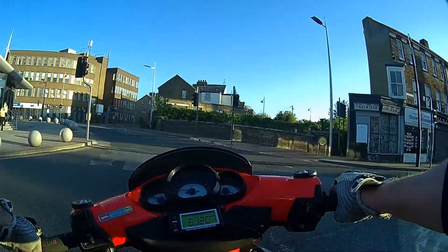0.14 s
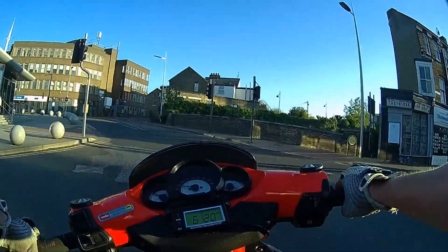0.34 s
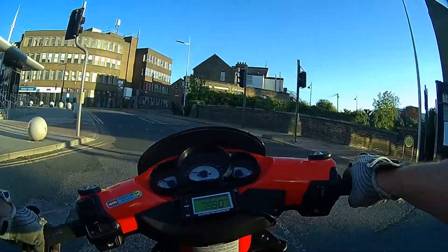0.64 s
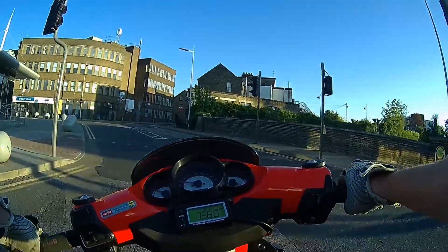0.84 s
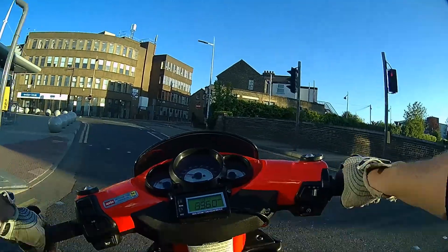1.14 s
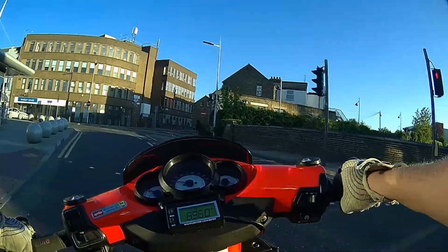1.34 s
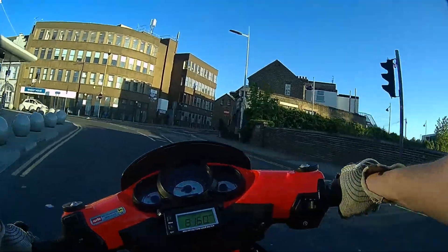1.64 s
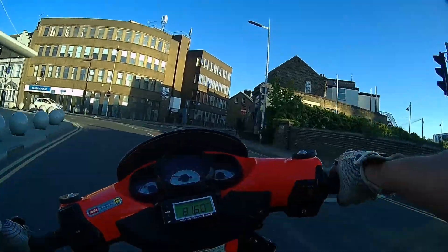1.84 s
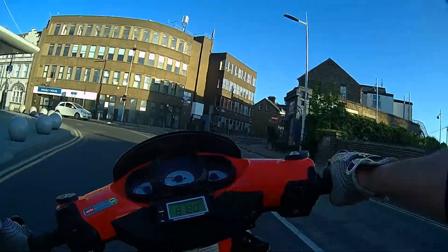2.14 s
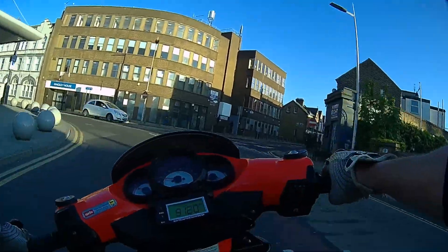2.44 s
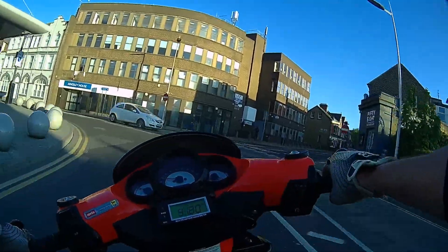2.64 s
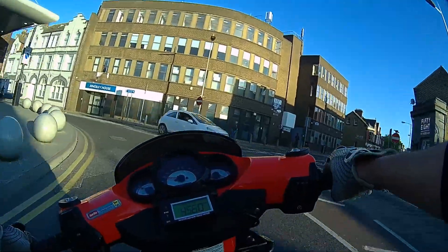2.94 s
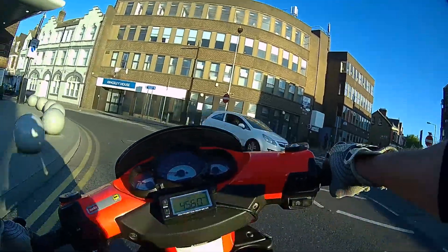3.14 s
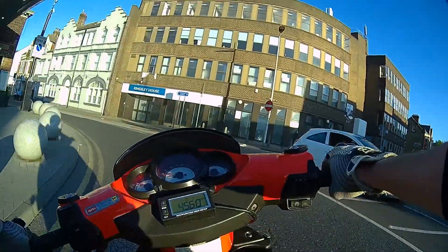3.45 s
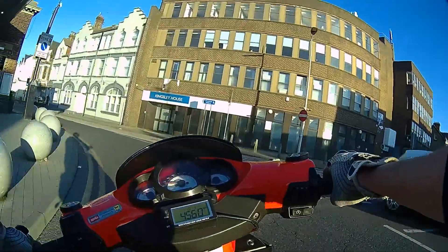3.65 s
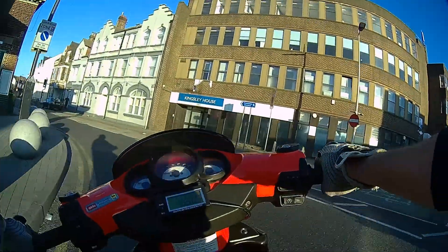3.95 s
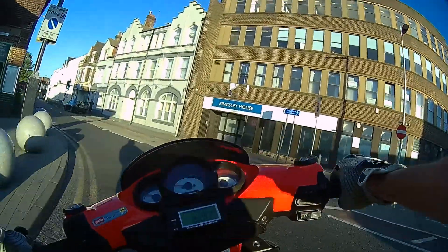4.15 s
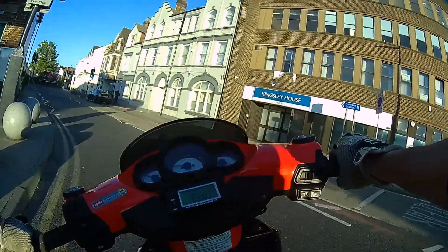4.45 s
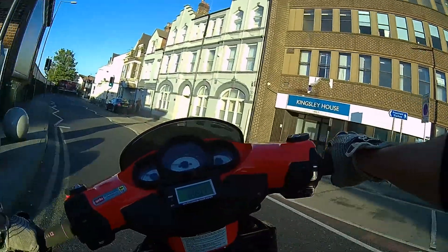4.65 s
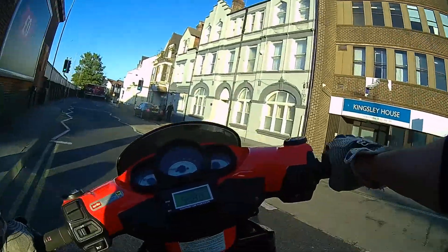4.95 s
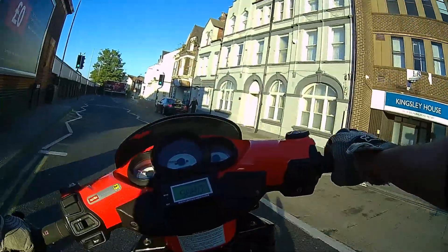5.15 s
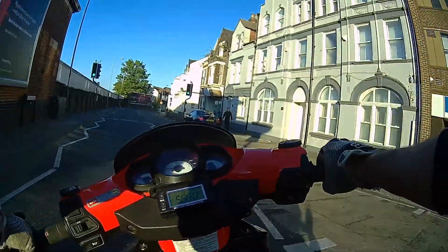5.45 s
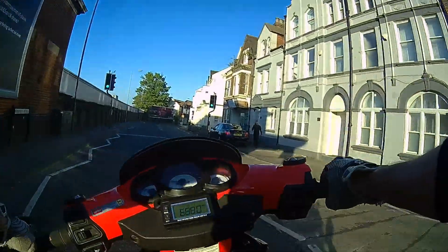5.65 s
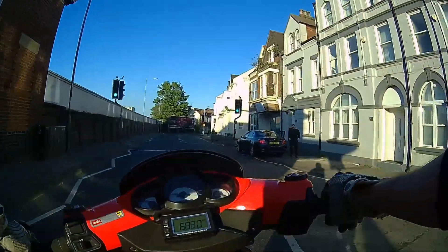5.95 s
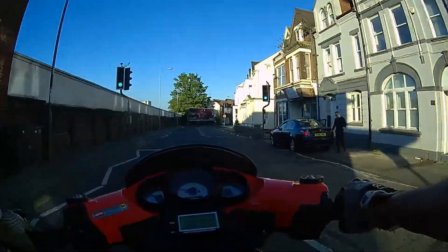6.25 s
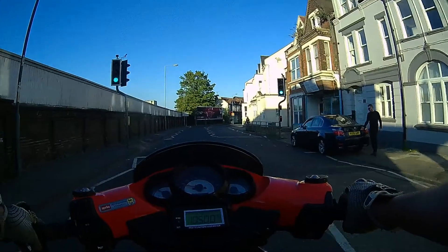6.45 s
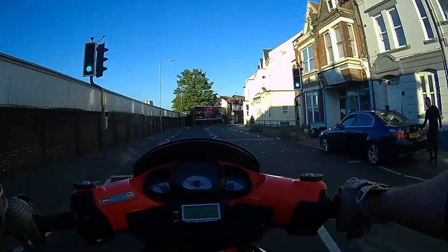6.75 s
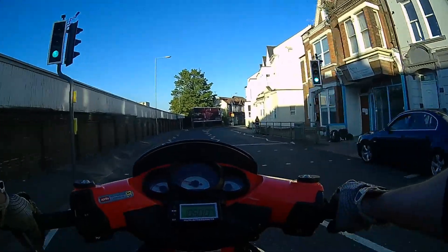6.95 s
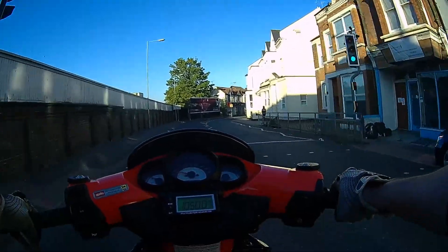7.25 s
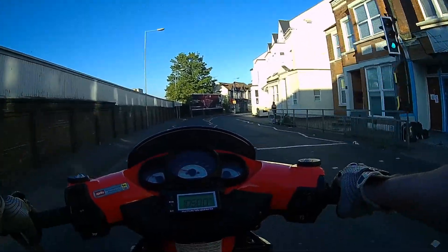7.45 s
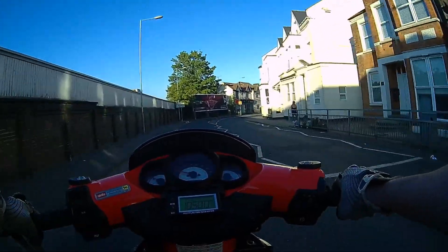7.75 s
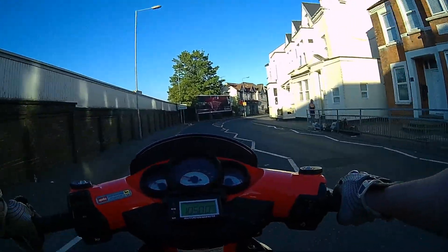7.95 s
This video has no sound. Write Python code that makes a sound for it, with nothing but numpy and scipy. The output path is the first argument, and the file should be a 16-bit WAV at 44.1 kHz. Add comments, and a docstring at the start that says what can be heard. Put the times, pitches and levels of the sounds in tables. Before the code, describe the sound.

A small two-stroke scooter cruises along a town street, heard from the rider's seat. Its engine hums and barks unevenly, then drops in pitch and sputters with dull exhaust thuds as it coasts. It pulls away with a rising rasp, stutters briefly, and settles into a faster, even drone. Wind buffets the microphone over a steady rush of tyres and street, with a few faint ticks from loose parts.

```python
"""A small two-stroke scooter, heard from the rider. It cruises: one firing per crank turn hums and barks
in the exhaust, missing and catching again; the casing hisses, wind buffets the microphone, the street
rushes, loose parts tick. From 1.4 s it coasts through a bend and misses kick and thud in the pipe.
From 3.3 s it pulls away with bite and rasp, stutters again at 4.6-5.2 s, then runs fast and even.
Overtones swell and fade throughout as walls pass."""
import sys
import numpy as np
from scipy import signal
from scipy.fft import rfft, irfft, next_fast_len
from scipy.io import wavfile
from scipy.ndimage import uniform_filter1d, map_coordinates

SR = 44100
rng = np.random.default_rng(int(sys.argv[2]) if len(sys.argv) > 2 else 0)


def generate_wav(sig):
    """Save sig (samples, or channels by samples) to the path in sys.argv[1] as 16-bit PCM at SR."""
    pcm = np.round(np.clip(np.atleast_2d(sig).T, -1, 1) * 32767).astype(np.int16)
    wavfile.write(sys.argv[1], SR, pcm)


N = 356813
TIME_S = np.arange(N) / SR
REF_CRANK_HZ = 90

# engine state: t/s, crank speed/Hz, bark level/dB, swell of the hum/dB, crank shake level/dB
RIDE = [(0, 90.48, -45.5, -3, -36.5), (.5, 90.8, -45, -2, -32), (.88, 91.07, -43.5, -1.5, -33),
        (1.2, 88.4, -40.5, -2, -33.5), (1.35, 87, -47, -1.5, -31), (1.55, 83.64, -59, 0.5, -30.5),
        (1.8, 79.86, -63.5, -5, -30.5), (2.0, 77.46, -52, -4.5, -35), (2.23, 76.46, -54, -5.5, -34),
        (2.4, 76.16, -49, -7, -36.5), (2.85, 76.83, -47.5, -6.5, -42), (3.3, 77.34, -46, -3, -49),
        (3.5, 81, -44, -0.5, -41), (3.76, 84.27, -44, 2.5, -41), (4.0, 87.6, -47, 0, -34.5),
        (4.19, 88.6, -42.5, 0.5, -37), (4.57, 94.6, -40, 4, -35.5), (4.82, 95.65, -40.5, 1.5, -40),
        (4.96, 98.24, -38, 9, -32.5), (5.12, 102.1, -39.5, 6.5, -35.5), (5.29, 105.9, -38.5, 10.5, -33),
        (5.4, 108.6, -38.5, 8.5, -32.5), (5.5, 110.1, -39, 6, -36), (5.75, 111.2, -40, 7, -34.5),
        (6.0, 113, -40, 4.5, -42), (6.35, 115.6, -40, 2.5, -28.5), (6.75, 117.6, -40, 4.5, -27.5),
        (7.05, 116.7, -40.5, 1.5, -25.5), (7.35, 116.5, -40, 4, -27), (7.7, 115.4, -40.5, 3, -31),
        (8.09, 111.8, -40.5, 4, -27)]
# missed firings: t of the catch/s, catch level/dB, miss depth/dB, base length/s
MISSES = [(0.0566, -34.5, 4.2, 0.02), (0.241, -32, 12, 0.024), (0.3678, -29.5, 15, 0.031),
          (0.4502, -31.5, 18, 0.019), (0.6723, -32.5, 9.9, 0.031), (0.7624, -33, 13, 0.032),
          (0.8316, -27, 15, 0.024), (0.908, -32, 12, 0.012), (0.982, -34.5, 6.7, 0.027),
          (1.1017, -29.5, 8, 0.04), (1.1598, -32, 9.5, 0.02), (1.237, -31, 6.7, 0.04),
          (1.2969, -33, 6.4, 0.015), (1.358, -41.5, 4.9, 0.018), (1.4986, -38.5, 16, 0.032),
          (1.607, -40.5, 11, 0.018), (1.717, -42.5, 10, 0.039), (1.8045, -43, 11, 0.021),
          (1.984, -38, 8.4, 0.033), (2.0792, -37, 7.5, 0.048), (2.168, -37.5, 27, 0.048),
          (2.236, -37, 23, 0.03), (2.3144, -37, 10, 0.044), (2.393, -37, 8.3, 0.025),
          (2.458, -35.5, 16, 0.03), (2.54, -35, 17, 0.03), (2.594, -28.5, 8.4, 0.027),
          (2.6672, -30, 12, 0.041), (2.734, -33.5, 14, 0.021), (2.7911, -36, 11, 0.025),
          (2.8558, -33.5, 9.5, 0.024), (2.9084, -31.5, 19, 0.024), (2.9741, -38, 20, 0.037),
          (3.0663, -32.5, 14, 0.032), (3.1315, -34, 8, 0.045), (3.183, -33.5, 10, 0.021),
          (3.249, -35.5, 13, 0.047), (3.314, -33.5, 11, 0.031), (3.366, -38, 5.1, 0.015),
          (4.63, -29, 18, 0.016), (4.672, -27.5, 22, 0.02), (4.7241, -26, 8.5, 0.039),
          (4.8288, -29, 7.1, 0.014), (4.873, -27.5, 18, 0.012), (4.902, -31, 11, 0.013),
          (4.984, -29.5, 18, 0.017), (5.084, -26, 8, 0.0088), (5.174, -28.5, 22, 0.01)]


def amp(db):
    return 10 ** (np.asarray(db) / 20)


def unit(x):
    """x at rms 1."""
    return x / np.sqrt(np.mean(x ** 2) + 1e-20)


def evened(x):
    """x at rms 1 over a sliding 1/3 s."""
    return x / np.sqrt(np.abs(uniform_filter1d(x ** 2, size=SR // 3)) + 1e-12)


def curves(rows):
    """One value per sample for each column after t/s."""
    times, *columns = np.transpose(rows)
    return [np.interp(TIME_S, times, column) for column in columns]


def wobble(rate_hz):
    """Smooth random curve, rate_hz knots a second."""
    t = np.linspace(0, N / SR, num=4000)
    return np.interp(TIME_S, t, map_coordinates(rng.standard_normal(400), [t * rate_hz]))


def coloured(x, points):
    """x through a minimum-phase filter of (f/Hz, gain/dB) points, at rms 1."""
    f, db = np.transpose(points)
    hz = np.fft.rfftfreq(2 ** 13, 1 / SR)
    gain = amp(np.interp(np.log(hz + 1), np.log(f + 1), db))
    cepstrum = irfft(np.log(gain + 1e-6))
    cepstrum[1:len(hz) - 1] *= 2
    cepstrum[len(hz):] = 0
    response = irfft(np.exp(rfft(cepstrum)))[:len(hz)]
    return unit(signal.oaconvolve(x, response)[:N])


def ping(hz, t60_s, attack_s):
    """One decaying mode, 0.1 s long."""
    t = np.arange(SR // 10) / SR
    return amp(-60 * t / t60_s) * (1 - np.exp(-t / attack_s)) * np.sin(2 * np.pi * hz * t)


def struck(events, shape):
    """shape placed at each (t/s, gain/dB) event."""
    out = np.zeros(N + SR)
    for s, db in events:
        out[round(s * SR):][:len(shape)] += amp(db) * shape
    return out[:N]


def timbre_at(s):
    """Exhaust tone colour, 0-3: a blend position among four pipe timbres."""
    positions = [(0, -0.5), (1.25, 0.5), (1.5, 2.5), (1.8, 1.14), (2.1, 1), (3.0, 1.5), (3.5, 1.68),
                 (4.0, 3.5), (4.45, 3), (5.1, 4.5)]  # t/s, blend position before clipping
    return np.clip(np.interp(s, *np.transpose(positions)), 0, 3)


def by_timbre(values, s=TIME_S):
    """Blend of four values, one per pipe timbre."""
    return np.interp(timbre_at(s), range(4), values)


def crank_turns():
    """Turns so far, nudged so that catches at blend positions under 1.6 fall near firings."""
    turns = np.cumsum(curves(RIDE)[0]) / SR
    catches = np.array([s for s, *_ in MISSES if timbre_at(s) < 1.6]) * SR
    bark_lag_turns = 0.101
    phase = 2 * np.pi * (np.interp(catches, np.arange(N), turns) - bark_lag_turns)
    slip = np.arctan2(uniform_filter1d(np.sin(phase), size=7), uniform_filter1d(np.cos(phase), size=7))
    return turns - np.interp(np.arange(N), catches, np.unwrap(slip)) / (2 * np.pi)


def combustion_db():
    """Burn strength: fades in a miss, then unburnt fuel makes it pop and surge."""
    stretch = [0.85, 1.8, 0.5, 0.6]  # miss length factor per timbre
    pop_db, pop_s = [1.8, 3.1, 0.82, 0.77], 0.0082  # level per timbre
    crest_db, surge_s = 10.5, 0.03  # crest: ordinary firing peak over bark level
    bark_db = curves(RIDE)[1]
    t = np.arange(SR // 5) / SR
    burn_db = np.zeros(N)
    for s, catch_db, depth_db, length_s in MISSES:
        at = round(s * SR)
        gap = burn_db[at - round(by_timbre(stretch, s) * length_s * SR):at]
        fade_s = 0.16 * len(gap) / SR + 1e-4
        gap -= depth_db * np.clip(t[:len(gap)] / fade_s, 0, 1)
        surge_db = (catch_db - bark_db[at] - crest_db) * np.exp(-t / surge_s)
        burn_db[at:][:len(t)] += surge_db + by_timbre(pop_db, s) * (t < pop_s)
    return burn_db


def firing_pulses(turns, jitter_turns, scatter_db):
    """One sharp pulse per turn, slightly uneven in time and size."""
    whole = np.arange(1, int(turns[-1]))
    chance = rng.standard_normal((len(whole), 2))
    at = np.interp(whole + jitter_turns * chance[:, 0], turns, np.arange(N))
    taps = at.astype(int)[:, None] + np.arange(-7, 9)
    pulses = np.sinc(taps - at[:, None]) * np.hanning(18)[1:-1] * amp(scatter_db * chance[:, 1:])
    return evened(np.bincount(np.clip(taps, 0, N - 1).ravel(), pulses.ravel(), N))


def road_echo(x, db):
    """x plus its reflection off road and kerb; the delay shifts as the scooter leans."""
    delays = [(0, 4.035), (3.2, 4.12), (3.7, 4.2), (4.3, 4.05), (4.8, 4.0), (5.2, 3.2), (5.6, 3.29),
              (6.1, 3.895), (6.6, 3.6), (6.9, 3.5), (7.1, 3.65), (7.4, 3.75), (7.8, 3.45), (8.09, 3.5)]  # t/s, delay/ms
    lag = (curves(delays)[0] + .06 * wobble(2)) * SR / 1000
    echo = np.interp(np.arange(N) - lag, np.arange(N), x)
    return (x + amp(db) * echo) / np.sqrt(1 + amp(2 * db))


def hum(turns, burn_db):
    """Crank orders 1-9: once-a-turn shake, and overtones that sweep through pipe and frame resonances."""
    orders = [(-29.5, -30.5, -35.5, -31, 0.54), (-32.5, -30.5, -37, -34, 0.87),
              (-31.5, -31.5, -32.5, -39.5, 1.59), (-40.5, -28.5, -29, -35.5, 0.68),
              (-50.5, -35, -39.5, -35, 0.38), (-39.5, -47.5, -41.5, -44, 1.3),
              (-43.5, -41.5, -45, -46.5, 1.1), (-51, -43, -41, -45.5, 0.38)]  # orders 2-9: level/dB in timbres 0-3, dB per dB of swell
    resonances = [(150, 4), (185, -4.5), (205, -0.5), (230, 0.5), (250, 1.5), (270, 10), (305, 5.5),
                  (325, 1.5), (345, 10.5), (365, 4.5), (400, -10.5), (430, -8), (460, 1), (480, -6.5),
                  (520, -10.5), (585, 0), (620, 0.5), (660, -2.5), (700, -8.5), (800, -1), (860, -9),
                  (950, -8.5), (1060, -12.5)]  # f/Hz, gain/dB
    growl = [(0, 3.5, -5, 2, 1.5, -6.5), (1.3, 1, -2, 0.5, -1.5, -5.5), (1.7, 2.5, -3.5, -13.5, -1.5, -9),
             (3.2, -3, 0.5, -7, -3, 3), (3.5, 0.5, -4, 4, 2.5, -2.5), (4.0, 1.5, 4, 0, -2, -2.5),
             (4.4, -3.5, 0.5, 2, 3.5, -3.5), (4.8, 7.5, -1, -5.5, 2, 11.5), (5.1, -1, -0.5, 0, -1.5, 6.5),
             (5.4, 3, -1.5, 0, 1, 3), (5.65, 4, -1, 2.5, -2.5, -1), (5.9, -4.5, 0.5, 0, -5, -7),
             (6.15, -1.5, -5, 7, 5, -6), (6.5, 6, 6, -0.5, 3.5, -3), (6.75, 3.5, 4, -1, -6, -5),
             (6.92, -0.5, 10, -7, -5, -6), (7.1, 0.5, 5.5, 6.5, 4, -14), (7.4, 2, 2, 1.5, 1, -4.5),
             (7.72, 0.5, 2.5, -2, -2.5, -8), (8.09, 1.5, -2, 0, -1, -2)]  # leaning and passing walls: t/s, gain/dB of orders 5-9
    burn_shares = [0.19, 0.096, 0.43, 0.64, 0.11, 0.28, 0.42, 0.98, 0.87]  # share of burn_db felt by orders 1-9; the rest is shake and pumping
    suck_back = [0.14, 0.11, 0.45, 0.35]  # swing of order 3 through zero in a deep miss: share per timbre
    lumpiness = [0.77, 3.5, 1.2, 0.3]  # uneven burning: depth/dB per timbre
    lead_s, ring_on_s = 0.0042, 0.0021  # hum returns ahead of the bark; ringing rounds off each miss
    felt_db = uniform_filter1d(np.roll(burn_db, -int(lead_s * SR)), int(ring_on_s * SR))
    crank_hz, _, swell_db, shake_db = curves(RIDE)
    levels_db = [shake_db]
    for order, (*timbre_db, growth) in enumerate(orders, start=2):
        resonance_db = np.interp(order * crank_hz, *np.transpose(resonances))
        levels_db.append(by_timbre(timbre_db) + growth * swell_db + resonance_db)
    levels_db[4:] = np.add(levels_db[4:], curves(growl))
    lumps_db = by_timbre(lumpiness) * wobble(24)
    out = np.zeros(N)
    for order, (db, share) in enumerate(zip(levels_db, burn_shares), start=1):
        flutter_db = (.8 + .25 * abs(order - 3)) * wobble(11) + .25 * max(order - 3, 0) * wobble(3)
        fired = amp(share * felt_db)
        if order == 3:
            fired -= by_timbre(suck_back) * np.clip(1 - amp(felt_db), 0, 1)
        phase = order * (2 * np.pi * turns + .16 * wobble(5))
        out += amp(db + flutter_db + share * lumps_db) * fired * np.sin(phase)
    return np.sqrt(2) * road_echo(out, db=-15)


def exhaust_jet(turns, burn_db, blasts):
    """Pipe excitation: each blast plus a puff of turbulent gas."""
    gas_share = by_timbre([.06, .2, .09, .2])
    puff = unit(np.exp(0.82 * np.cos(2 * np.pi * turns - 1.2)) * rng.standard_normal(N))
    return np.sqrt(1 - gas_share) * blasts + np.sqrt(gas_share) * amp(burn_db) * puff


def shell_ring(blasts):
    """Blasts ring the silencer's metal shell."""
    spectrum = [(2400, -46.5), (2600, -12), (2690, 1), (2780, -14.5), (3000, -49)]  # f/Hz, gain/dB
    levels = [(0, -66.5), (1.25, -64), (1.5, -77), (5.3, -68.5), (5.7, -56.5), (5.9, -52), (6.08, -50.5),
              (6.25, -60.5), (7.0, -61.5), (8.09, -64.5)]  # t/s, level/dB
    return amp(curves(levels)[0] + 2 * wobble(3.8)) * coloured(blasts, spectrum)


def baffles(x, delay_s_per_hz=3e-6):
    """Silencer baffles delay the higher modes, drawing each pulse into a short sweep."""
    size = next_fast_len(N + SR // 4)
    hz = np.fft.rfftfreq(size, 1 / SR)
    return irfft(rfft(x, size) * np.exp(-1j * np.pi * delay_s_per_hz * hz ** 2), size)[:N]


def passing_walls(x, depth_db):
    """Overtones flare and fade as walls and parked cars pass: random gain patches in f and t."""
    spectra = signal.stft(x, nperseg=1024)[2]
    patches = uniform_filter1d(rng.standard_normal(spectra.shape), size=3, axis=0)
    patches = uniform_filter1d(patches, size=14, axis=1)
    return signal.istft(spectra * amp(depth_db * unit(patches)), nperseg=1024)[1][:N]


def bark(jet):
    """The jet barks out of the pipe's end, crossfading among four timbres."""
    # pipe spectra: f/Hz, gain/dB
    timbre_0 = [(600, -48.5), (850, -25), (980, 0.5), (1160, 5.5), (1300, -0.5), (1460, -10.5), (1680, -3),
                (1800, -13.5), (1950, -6.5), (2150, -10), (2350, 3.5), (2560, -14.5), (2710, -10),
                (2820, -16), (3000, -37.5), (3300, -56.5)]
    timbre_1 = [(600, -27.5), (800, 5.5), (1000, -4), (1100, -16), (1250, -7.5), (1450, -5.5),
                (1700, -12.5), (1890, -15.5), (2200, -10.5), (2400, -13.5), (2580, -26.5), (2900, -33),
                (3300, -52.5)]
    timbre_2 = [(650, -26.5), (850, -1.5), (1050, -6), (1260, 1), (1450, -10), (1700, -5), (1950, -12.5),
                (2150, -1.5), (2400, -0.5), (2600, -13.5), (2900, -37), (3300, -67.5)]
    timbre_3 = [(700, -38.5), (900, 2.5), (1100, -4.5), (1350, -0.5), (1480, -7), (1670, -1), (1820, -6),
                (1960, -11), (2400, -5.5), (2740, -15.5), (2900, -23), (3100, -27.5), (3450, -31.5),
                (3700, -49.5)]
    position = timbre_at(TIME_S)
    direct = np.zeros(N)
    for k, spectrum in enumerate((timbre_0, timbre_1, timbre_2, timbre_3)):
        weight = np.clip(1 - np.abs(position - k), 0, 1)
        direct += weight * coloured(jet, spectrum + [(5000, -110)])
    bark_db = curves(RIDE)[1] + 0.25 * wobble(7.5)
    reflected = road_echo(baffles(direct), db=-4)
    return amp(bark_db) * unit(passing_walls(reflected, depth_db=1.8))


def casing(turns, burn_db, firings):
    """Casing hiss, the same piston and ring rattle each turn, and a faint fan and gear whirr."""
    spectrum = [(2200, -9.5), (2700, 0), (3000, -1.5), (3180, -9), (3400, -2), (3950, -14), (4200, -8),
                (4400, -1.5), (4600, -11), (4950, -9), (5250, -5), (5850, -12), (6350, -9.5), (6900, -18),
                (7400, -14.5), (8700, -21), (10000, -19), (11500, -27.5), (14000, -34), (15500, -30)]  # f/Hz, gain/dB
    whirr_order, ref_bark_db = 29, -45
    crank_hz, bark_db, *_ = curves(RIDE)
    hiss = np.exp(0.079 * np.cos(2 * np.pi * turns - 1.3)) * rng.standard_normal(N)
    rattle = signal.oaconvolve(firings, rng.standard_normal(SR // 100))
    rattle = coloured(rattle, [(100, 0), (6000, 0), (8000, -20)])
    drive = amp(.16 * burn_db + .7 * wobble(18)) * (hiss + .65 * rattle)
    whirr_db = -14 + np.interp(whirr_order * crank_hz, *np.transpose(spectrum)) + 3 * wobble(4)
    whirr = amp(whirr_db) * np.sin(2 * np.pi * whirr_order * turns + 1.2 * wobble(20))
    level_db = -60.5 + 0.37 * (bark_db - ref_bark_db) + 10.5 * np.log2(crank_hz / REF_CRANK_HZ)
    return amp(level_db) * (evened(coloured(drive, spectrum)) + whirr)


def wind_buffet():
    """Head wind hits the microphone in low lumps."""
    spectrum = [(10, -27.5), (20, -11.5), (40, 5), (70, -9), (120, -4), (200, -38), (400, -76)]  # f/Hz, gain/dB
    levels = [(0.0, -58.5), (0.16, -45.5), (1.46, -40), (1.71, -33.5), (1.89, -39.5), (2.46, -38.5),
              (2.52, -42.5), (2.88, -34), (3.54, -54), (3.74, -36), (3.92, -50.5), (4.19, -28.5),
              (4.3, -42), (5.3, -41), (5.7, -35), (6.1, -38), (6.45, -33), (6.8, -41.5), (7.1, -29),
              (7.57, -29), (8.09, -27)]  # t/s, level/dB
    lumps = amp(1.1 * wobble(21)) * coloured(rng.standard_normal(N), spectrum)
    return amp(curves(levels)[0]) * unit(lumps)


def street_rush():
    """Broad noise of tyres and street."""
    spectrum = [(40, -25.5), (80, 1), (150, -4), (300, 1), (450, 0), (620, -6), (800, -14.5), (1100, -23.5),
                (2000, -27), (2800, -29.5), (3500, -70)]  # f/Hz, gain/dB
    levels = [(0, -31), (.4, -30.5), (1.2, -29), (1.6, -34.5), (2.4, -33.5), (2.9, -32), (3.5, -33),
              (4.0, -30.5), (4.5, -31), (5.0, -26), (5.4, -30), (6.2, -30.5), (7.0, -29.5), (8.09, -29)]  # t/s, level/dB
    return amp(curves(levels)[0] + 0.37 * wobble(20)) * coloured(rng.standard_normal(N), spectrum)


def wind_wash():
    """Head wind round the bodywork, rising with crank speed."""
    spectrum = [(450, -19.5), (650, 25.5), (850, 22.5), (1050, 16), (1400, -2), (2200, -8.5), (3000, 3),
                (4800, -6.5), (7000, -12.5), (11000, -24), (15500, -29)]  # f/Hz, gain/dB
    level_db = -50 + 22 * np.log2(curves(RIDE)[0] / REF_CRANK_HZ) + wobble(3.8)
    return amp(level_db) * coloured(rng.standard_normal(N), spectrum)


def whine(hz, db):
    """A thin, slightly wavering tone."""
    return amp(db + 2.7 * wobble(5)) * np.sin(2 * np.pi * hz * TIME_S + .6 * wobble(8))


def loose_parts():
    """Bodywork clicks and a loose steel part ticks, each in one mode."""
    # t/s, gain/dB
    clicks = [(0.626, -66), (1.3404, -55), (1.477, -50), (1.8136, -50), (4.2707, -47)]
    ticks = [(0.9163, -73), (0.9911, -64), (1.1039, -61), (1.1502, -69), (1.2077, -70), (1.4366, -81),
             (1.6322, -68), (3.8237, -70), (4.1714, -67)]
    bodywork = struck(clicks, ping(hz=5230, t60_s=0.012, attack_s=0.0004))
    steel = struck(ticks, ping(hz=9320, t60_s=0.04, attack_s=0.0028))
    return 1.2 * bodywork + 1.8 * steel


def pipe_kicks():
    """A miss upsets the pipe: a dull push of pressure, its undertow and a brief boom."""
    kicks = [(1.499, -29), (1.607, -18), (1.717, -20), (2.459, -20), (2.907, -28), (3.009, -26),
             (3.069, -29.5), (3.188, -26), (1.729, -21), (1.816, -38), (1.985, -27), (2.172, -31),
             (2.24, -24.5), (2.322, -24), (4.618, -21), (4.721, -27), (4.858, -18), (4.972, -20),
             (5.159, -17), (5.183, -28)]  # t/s, gain/dB
    push_s = 0.001
    u = np.arange(SR // 10) / SR / push_s
    push = 1.6 * u ** 2 * (3 - u) * np.exp(-u)
    return struck(kicks, push + 0.9 * ping(hz=338, t60_s=0.1, attack_s=0.0011))


def pipe_thuds():
    """Low thumps as pipe pressure drops in a miss."""
    thuds = [(1.585, -21), (1.698, -20), (1.795, -24), (2.29, -17), (2.438, -17), (4.616, -23.5),
             (4.657, -25.5), (4.855, -20), (4.97, -16.5), (5.155, -18.5)]  # t/s, gain/dB
    drop_s = 0.0023
    u = np.arange(SR // 10) / SR / drop_s
    return struck(thuds, -u * np.exp(1 - u) * (1 - u / 4))


def pipe_bite(jet):
    """The pipe bites near 2.2 kHz as the scooter pulls away."""
    spectrum = [(1800, -48), (2050, -5.5), (2200, -2), (2400, -6.5), (2600, -30.5), (2900, -62.5)]  # f/Hz, gain/dB
    levels = [(3.1, -71), (3.35, -53), (3.6, -59.5), (3.9, -48), (4.12, -48.5), (4.3, -48.5), (4.6, -46.5),
              (5.0, -71.5)]  # t/s, level/dB
    return amp(curves(levels)[0]) * coloured(baffles(jet), spectrum)


def pipe_rasp(jet):
    """The pipe rasps near 1.26 kHz under load."""
    spectrum = [(800, -34.5), (900, -12), (980, -4), (1090, -7), (1260, 12), (1400, -22), (1600, -65)]  # f/Hz, gain/dB
    levels = [(3.2, -68), (3.45, -58), (3.65, -57), (3.8, -71), (4.4, -60.5), (4.55, -44.5), (4.8, -44),
              (5.0, -38), (5.3, -42), (5.5, -57.5), (6.0, -67)]  # t/s, level/dB
    return amp(curves(levels)[0]) * coloured(baffles(jet), spectrum)


def scene():
    """Engine, air and small sounds at the microphone, mono."""
    turns, burn_db = crank_turns(), combustion_db()
    firings = firing_pulses(turns, jitter_turns=.0018, scatter_db=1.6)
    ignition_lead_s = 0.0032  # the charge lights just before the exhaust port opens
    blasts = amp(np.roll(burn_db, -int(ignition_lead_s * SR))) * firings
    engine = hum(turns, burn_db)
    jet = exhaust_jet(turns, burn_db, blasts)
    engine += shell_ring(blasts) + bark(jet) + casing(turns, burn_db, firings)
    engine += pipe_kicks() + pipe_thuds() + pipe_bite(jet) + pipe_rasp(jet)
    air = wind_buffet() + street_rush() + wind_wash()
    return (engine + air + whine(hz=7897, db=-91.5) + loose_parts())[None]


def record(dry):
    """Input stage: soft peak limit, then a sharp low-pass."""
    ceiling, top_hz = 0.4, 15720
    soft = dry / (1 + np.abs(dry / ceiling) ** 5) ** (1 / 5)
    size = next_fast_len(N + SR // 4)
    passband = np.fft.rfftfreq(size, 1 / SR) < top_hz
    return irfft(rfft(soft, size) * passband, size)[..., :N]


dry = scene()
out = record(dry)
generate_wav(out)
```